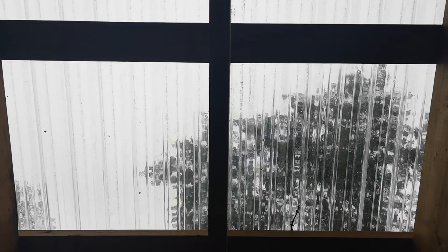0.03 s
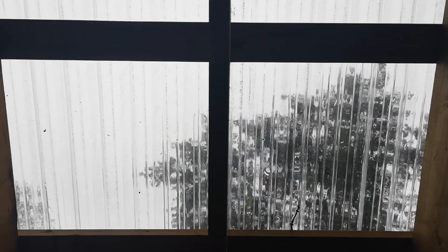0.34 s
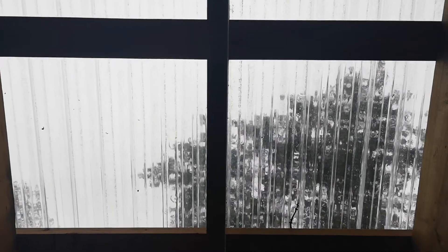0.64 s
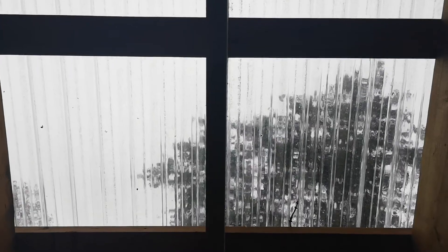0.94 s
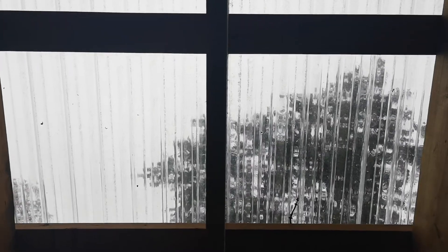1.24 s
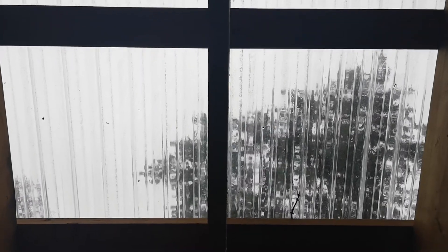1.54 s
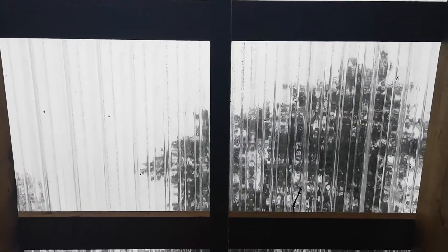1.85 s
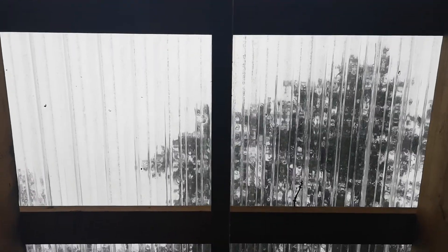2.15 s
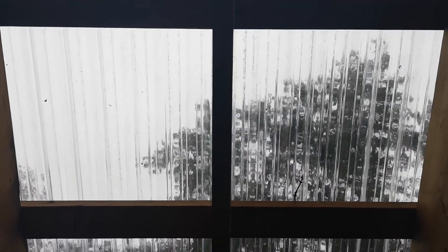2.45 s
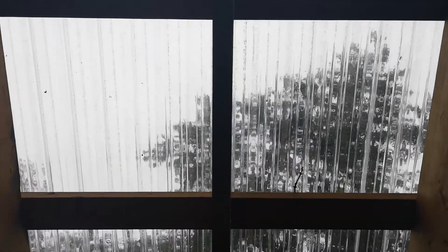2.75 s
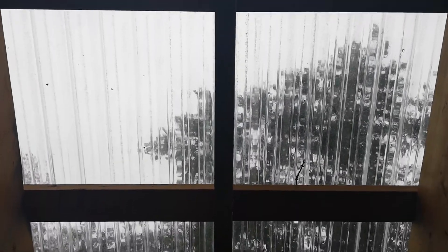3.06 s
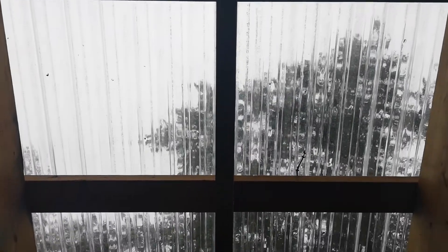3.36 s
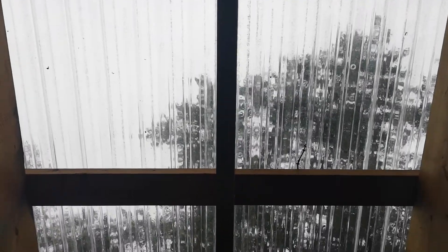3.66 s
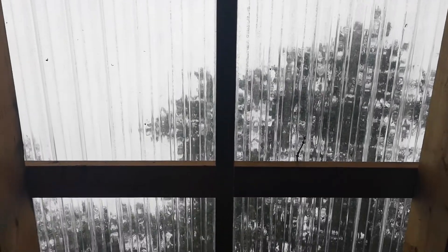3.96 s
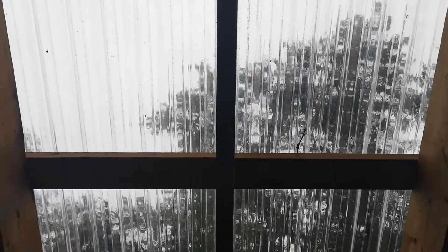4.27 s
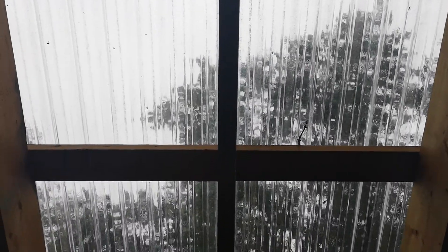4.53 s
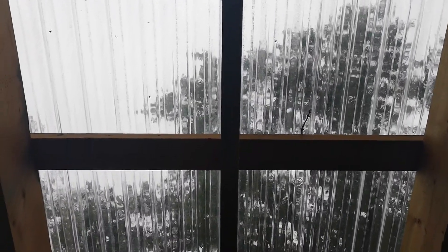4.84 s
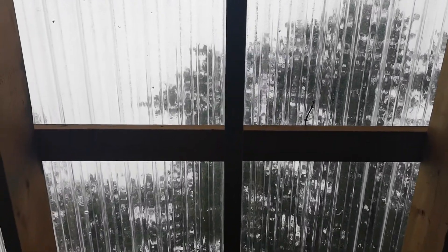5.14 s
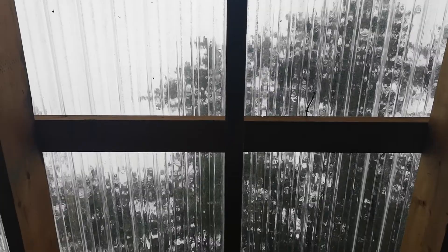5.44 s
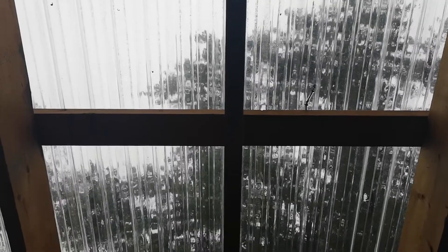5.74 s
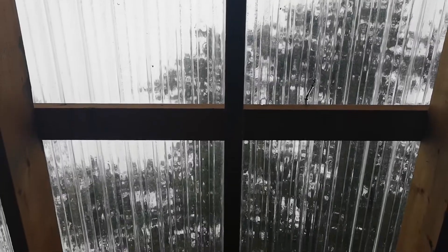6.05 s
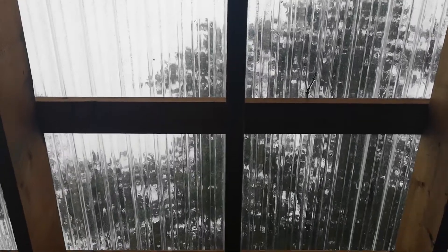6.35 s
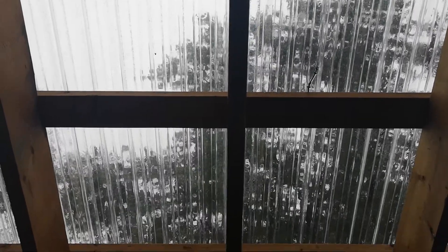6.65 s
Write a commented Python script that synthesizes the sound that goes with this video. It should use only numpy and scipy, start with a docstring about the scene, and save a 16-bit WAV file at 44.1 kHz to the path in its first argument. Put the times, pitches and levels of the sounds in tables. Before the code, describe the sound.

Under a porch, a close hand-held microphone picks up rain pattering evenly on the ribbed plastic panel overhead, with a faint rumble underneath. Small bright splashes dot the patter, and from about the middle the rain gets slightly heavier and several big drips land with soft thuds. Toward the end, low handling bumps duck the rain for a moment before it comes back.

```python
"""Steady rain on a corrugated plastic porch roof, heard from just below on a hand-held camera.
Thousands of impacts make the sheet patter, ring its ribs and set it drumming softly; a few distinct
drops splash or thud, and one tiny droplet ticks. The rain thickens a little halfway. Near the end soft
bumps shake the microphone, and its gain control ducks the rain for a moment."""
import sys
import numpy as np
from scipy import signal
from scipy.fft import rfft, irfft
from scipy.io import wavfile
from scipy.ndimage import uniform_filter1d

SR = 44100
rng = np.random.default_rng(int(sys.argv[2]) if len(sys.argv) > 2 else 0)


def to_wav(sig):
    """Store sig (one row per channel, or 1-D mono) as 16-bit WAV at the path in sys.argv[1].

    Samples outside -1..1 are clipped; the rate is SR.
    """
    pcm = np.clip(np.atleast_2d(sig), -1, 1) * 32767
    pcm = np.round(pcm).astype(np.int16)
    wavfile.write(sys.argv[1], SR, pcm.T)  # frames by channels


N = 304290
TIME = np.arange(N) / SR
HZ = np.fft.rfftfreq(N, 1 / SR)
SPLIT = np.array([[.5], [-.5]])  # shares a difference between left and right
# colour of the two microphone ports: (frequency [Hz], left minus right [dB])
PORT_COLOUR = [(250, -0.8), (450, 1.8), (700, 2.9), (1100, 0.3), (1500, 1.1), (1900, -1.2), (2650, 0.7),
               (3300, -1.2), (4250, -5.2), (4600, 0.2), (5600, 1), (6350, 2.9), (7200, 5.6), (7900, 6.9),
               (8300, 5.5), (9200, -2), (10500, 0)]


def gain_of(db):
    """Decibels to an amplitude ratio."""
    return 10 ** (np.asarray(db) / 20)


def unit_rms(x):
    """Normalisation to an rms of one."""
    return x / np.sqrt(np.mean(x ** 2) + 1e-20)


def curve_at(points, hz):
    """Interpolation of a table on a log-frequency axis."""
    f, value = np.transpose(points)
    return np.interp(np.log(hz + 1), np.log(f + 1), value)


def minimum_phase(x, db):
    """Minimum-phase filtering is causal, so clicks keep their sharp fronts."""
    log_gain = np.log(gain_of(db))
    mirrored = np.concatenate([log_gain, log_gain[..., -2:0:-1]], axis=-1)
    response = np.exp(np.conj(signal.hilbert(mirrored)))[..., :len(HZ)]
    return irfft(rfft(x) * response, N)


def wander(corner_hz):
    """Low-passed noise: a slow random fluctuation of unit rms."""
    spectrum = rfft(rng.standard_normal(N)) * (HZ > 0)
    return unit_rms(irfft(spectrum / (1 + (HZ / corner_hz) ** 2), N))


def diffuse_field():
    """Sound from all sides is coherent at the two ports in the bass, incoherent in the treble."""
    # likeness of the two ports: (frequency [Hz], coherence [-1 to 1])
    port_coherence = [(40, 1), (130, 1), (230, 0.95), (330, 0.68), (500, -0.12), (650, -0.18), (780, -0.66),
                      (1020, 0.59), (1350, 0.11), (1850, 0.19), (2500, -0.42), (3050, 0.13), (3650, 0.17),
                      (4300, -0.19), (5500, 0.033)]
    left, unrelated = rfft(rng.standard_normal((2, N)))
    coherence = np.clip(curve_at(port_coherence, HZ), -1, 1)
    right = coherence * left + np.sqrt(1 - coherence ** 2) * unrelated
    return irfft(np.array([left, right]), N)


def reverberation(clicks, fade_s):
    """Exponential decay spreads each click's energy over a diffuse tail of noise."""
    retained = np.exp(-2 / (fade_s * SR))
    energy = signal.lfilter([1 - retained], [1, -retained], clicks ** 2)
    return np.sqrt(energy) * diffuse_field()


def rain_strength():
    """The amplitude envelope of the rain: it eases a little, then swells and stays heavier."""
    # how hard it rains: (time [s], level [dB])
    rain_levels = [(.9, -36.1), (1.5, -36.6), (2.8, -36.9), (3.5, -36), (3.72, -35.4), (4.12, -35.5),
                   (4.35, -35.1), (6.4, -35), (6.9, -34.5)]
    return gain_of(np.interp(TIME, *np.transpose(rain_levels)))


def impacts(per_s=4800, spread_db=3.0, side_db=0.2, left_share=.78, port_gap_s=24 / SR):
    """Drops land as a Poisson process; each crack reaches the nearer port sooner and louder."""
    draws = rng.random((N, 4))
    at = np.flatnonzero(draws[:, 0] < per_s / SR)
    size, angle, which = draws[at, 1:].T
    amplitude = gain_of(spread_db * np.minimum(-np.log(1 - size), 4))
    side = np.cos(angle * np.pi / 2) * np.where(which < left_share, -1, 1)
    out = np.zeros((2, N))
    for port, facing in enumerate((-side, side)):
        lag = np.round(np.maximum(-facing, 0) * port_gap_s * SR).astype(int)
        out[port] = np.bincount(at + lag, amplitude * gain_of(side_db * facing), N)[:N]
    return out


def patter(strength, rattle_db=1, echo_db=-4, far_db=-5, flurry_db=0.47, level_db=2.5):
    """Impact excitation: the sheet's response colours cracks, rattle, porch echo and the far roof."""
    # what the sheet radiates under a drop: (frequency [Hz], gain [dB])
    sheet_response = [(120, -32.5), (520, -13.5), (650, -9.5), (740, -11.3), (790, -8.5), (930, -7),
                      (1020, -4), (1140, -3), (1290, -5), (1420, -3.1), (1530, -4), (1660, -1.95),
                      (1880, -3.5), (2080, -2), (2270, -3.5), (2400, -1.5), (2500, -2.4), (2600, -0.8),
                      (2690, -3.1), (2790, -3), (3030, -7.5), (3280, -10.8), (3530, -10.5), (3820, -13),
                      (4220, -13.4), (4550, -18), (5200, -17.5), (5850, -17.5), (6350, -22), (7200, -18),
                      (7900, -17.5), (8250, -20), (9300, -21.8), (10100, -31.5), (11000, -36.5),
                      (15000, -41)]
    cracks = impacts()
    rattle = gain_of(rattle_db) * reverberation(cracks, fade_s=0.014)
    echo = gain_of(echo_db) * reverberation(cracks, fade_s=0.1)
    overhead = unit_rms(cracks - cracks.mean(1, keepdims=True) + rattle + echo)
    far_roof = gain_of(far_db) * diffuse_field()
    colour_db = curve_at(sheet_response, HZ) + SPLIT * curve_at(PORT_COLOUR, HZ)
    rain = minimum_phase(overhead + far_roof, colour_db)
    return unit_rms(rain) * strength * gain_of(level_db + flurry_db * wander(corner_hz=27))


def rib_taps(strength, per_s=380, spread_db=0.8, detune=0.0348, ring_s=0.01, level_db=-8):
    """Heavier drops each excite one damped mode of the ribs, tuned a little differently at each spot."""
    # resonances of the ribs: (frequency [Hz], level [dB])
    rib_modes = [(1100, -10.5), (1850, -5.5), (2600, -9)]
    t = np.arange(SR // 20) / SR
    out = np.zeros((2, N))
    chance, size, mode = rng.random(N), rng.exponential(1, N), rng.integers(0, len(rib_modes), N)
    mistuning, side = rng.standard_normal((2, N))
    for at in np.flatnonzero(chance < per_s / SR):
        hz, db = rib_modes[mode[at]]
        port_turns = 0.25 * side[at] * SPLIT  # phase difference between the ports
        turns = hz * (1 + detune * mistuning[at]) * t + port_turns
        ring = np.sin(2 * np.pi * turns) * np.exp(-t / ring_s) * (1 - np.exp(-t * hz))
        out[:, at:at + len(t)] += gain_of(db + spread_db * min(size[at], 3)) * ring[:, :N - at]
    return unit_rms(out) * strength * gain_of(level_db)


def drumming(strength, level_db=-4.5, lag_s=0.0002):
    """Random forcing flexes the whole sheet: a low rumble that reaches the left port first."""
    # slow flexing of the sheet between its rafters: (frequency [Hz], gain [dB])
    flex_response = [(9.3, -17), (22, 1.0), (75, -0.5), (105, -3.5), (155, -6), (183, -2), (228, -8.5),
                     (270, -6.3), (380, -11), (520, -17.5), (750, -23.5), (2000, -60)]
    delay = np.exp(-2j * np.pi * HZ * np.array([[0], [lag_s]]))
    rumble = irfft(rfft(diffuse_field()) * delay * gain_of(curve_at(flex_response, HZ)), N)
    return unit_rms(rumble) * strength * gain_of(level_db)


def splashes(rise_s=0.0011, top_hz=9500, port_share=0.96, small_per_s=11):
    """Distinct drops splash or tick as decaying bands of noise; small splashes fall at random between."""
    # bright splashes and one tiny, high droplet tick near the microphone: (time [s], level [dB],
    # decay time [s], band centre [Hz], half-width [share of centre], left minus right [dB])
    distinct_drops = [(.779, -40, .009, 7000, .4, -1), (1.485, -35, .006, 7350, .09, 1),
                      (1.498, -41.5, .014, 7700, 0.19, 1), (3.18, -44, .012, 7800, .2, -5),
                      (4.083, -39.5, .005, 8300, 0.29, -5), (4.267, -43, .006, 5400, .2, -5),
                      (4.398, -36.5, .011, 4800, .4, -3), (4.41, -45, .03, 8200, .3, -3),
                      (4.62, -43, .008, 6200, .3, -5), (4.735, -40, .006, 7800, .2, 0),
                      (4.808, -41, .003, 8200, .15, 0), (5.081, -39, .007, 7600, .2, 4),
                      (5.402, -44, .015, 7600, .1, -1), (5.446, -36, .0006, 12500, .3, 0),
                      (6.264, -43, .005, 7800, .25, 4), (6.418, -46, .016, 5400, .25, 1),
                      (6.465, -45, .022, 9000, .45, 0), (6.496, -41, 0.022, 7200, .3, 0),
                      (6.769, -36, .005, 6700, .3, 0)]
    out = np.zeros((2, N))
    t = np.arange(SR // 10) / SR
    hz = np.fft.rfftfreq(len(t), 1 / SR)
    chance = rng.random(N)
    size, side = rng.standard_normal((2, N))
    small_drops = [(TIME[at], -44.5 + 2 * size[at], 0.0031, 7400, 0.27, 5 * side[at])  # same columns
                   for at in np.flatnonzero(chance < small_per_s / SR)]
    hiss = rng.standard_normal((2, N + len(t)))
    mic_rolloff = 1 / np.sqrt(1 + (hz / top_hz) ** 10)
    for start_s, db, fade_s, centre_hz, width, side_db in distinct_drops + small_drops:
        at = round(start_s * SR)
        band = unit_rms(1 / (1 + ((hz / centre_hz - 1) / width) ** 4))
        balance = gain_of(SPLIT * (side_db + port_share * curve_at(PORT_COLOUR, hz)))
        pulse = hiss[:, at:at + len(t)] * np.exp(-t / fade_s) * (1 - np.exp(-t / rise_s))
        drop = irfft(rfft(pulse) * band * mic_rolloff * balance, len(t))
        out[:, at:at + len(t)] += gain_of(db) * drop[:, :N - at]
    return out


def thuds(fade_s=0.012, rise_s=0.0028, boom_hz=185, boom_db=-16, boom_s=0.033):
    """A heavy drip pushes the sheet in with a soft thud and leaves a brief boom of free vibration."""
    # heavy drips on the sheet: (time [s], level [dB], frequency [Hz])
    drips = [(3.15, -24.5, 65), (4.317, -27, 65), (4.526, -32, 55), (5.068, -31, 74), (5.662, -31, 60)]
    out = np.zeros(N)
    for start_s, db, hz in drips:
        t = np.maximum(TIME - start_s, 0)
        push = np.sin(2 * np.pi * hz * t) * np.exp(-t / fade_s)
        boom = gain_of(boom_db) * np.sin(2 * np.pi * boom_hz * t) * np.exp(-t / boom_s)
        out += gain_of(db) * (1 - np.exp(-t / rise_s)) * (push + boom)
    return out


def bumps(rub_db=-24, rub_hz=75, knock_db=-27, knock_hz=100, overtone_db=-21):
    """Structure-borne noise: a deep sway swells and dies, with dull rubbing and a knock of the camera."""
    # bumps on the microphone: (time [s], level [dB], sway frequency [Hz], swell time [s])
    jolts = [(4.972, -31, 24, 0.019), (6.481, -11.5, 18.5, 0.054), (6.6, -15, 15.9, 0.053),
             (6.738, -28.5, 16, 0.042)]
    out = np.zeros(N)
    rub = unit_rms(irfft(rfft(rng.standard_normal(N)) / (1 + (HZ / rub_hz) ** 4), N))
    for start_s, db, sway_hz, swell_s in jolts:
        t = np.maximum(TIME - start_s, 0)
        swell = (t / swell_s * np.exp(1 - t / swell_s)) ** 2
        knock = gain_of(knock_db) * np.sqrt(swell) * np.sin(2 * np.pi * knock_hz * t)
        phase = 2 * np.pi * sway_hz * t
        sway = np.sin(phase) - gain_of(overtone_db) * np.cos(2 * phase)  # pushes harder than it pulls
        out += gain_of(db) * (swell * (sway + gain_of(rub_db) * rub) + knock)
    return out


def scene():
    """Superposition of all sources; one rain envelope drives the patter, the taps and the drumming."""
    strength = rain_strength()
    return patter(strength) + rib_taps(strength) + drumming(strength) + splashes() + thuds() + bumps()


def record(dry, threshold_db=-24, squeeze=0.27, recover_db_per_s=26, open_s=0.4885, edge_hz=15100):
    """The input opens; compression ducks loud moments and recovers slowly; a low-pass limits the band."""
    power = uniform_filter1d((dry ** 2).mean(0), size=600)
    power_db = 10 * np.log10(abs(power) + 1e-12)
    recovery_db = TIME * recover_db_per_s
    held_db = np.maximum.accumulate(power_db + recovery_db) - recovery_db  # peaks, sinking steadily
    over_db = np.maximum(held_db - threshold_db, 0)
    duck_db = squeeze * uniform_filter1d(over_db, size=1400)
    # silent at first, the input opens 2 dB low and comes up to level in 0.18 s
    opening = (TIME > open_s) * gain_of(-2 * np.clip(1 - ((TIME - open_s) / 0.18) ** 2, 0, 1))
    ducked = opening * dry / gain_of(duck_db)
    low_pass = signal.firwin(511, edge_hz, window=("kaiser", 9), fs=SR)
    return signal.oaconvolve(ducked, low_pass[None], "same")


dry = scene()
out = record(dry)
to_wav(out)
```